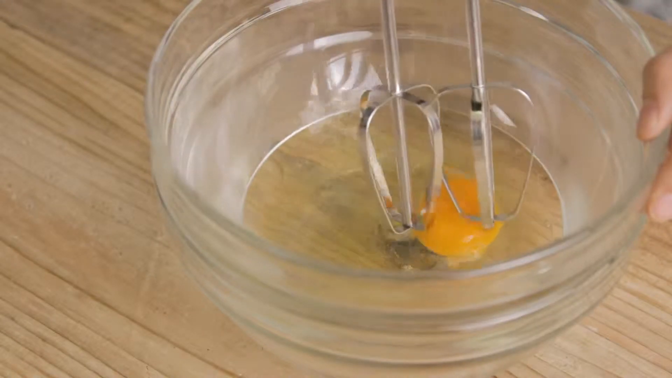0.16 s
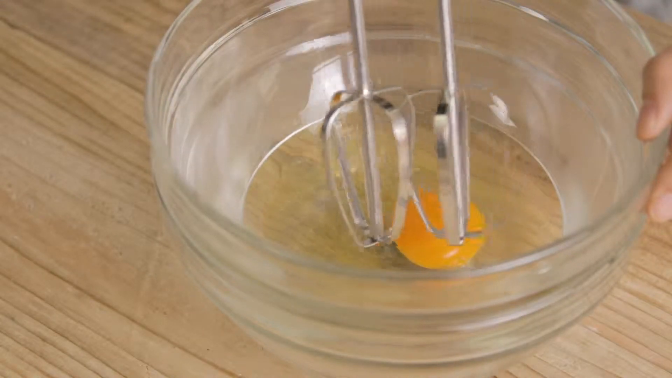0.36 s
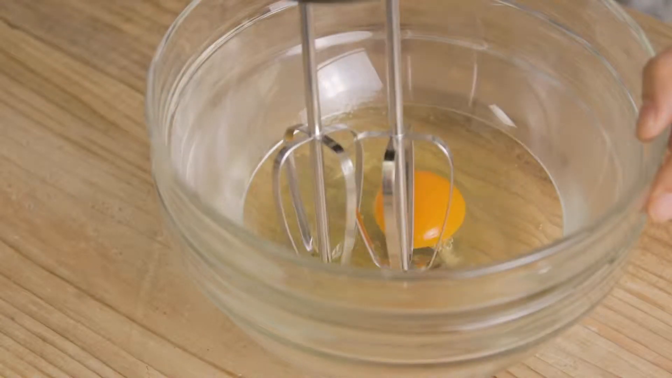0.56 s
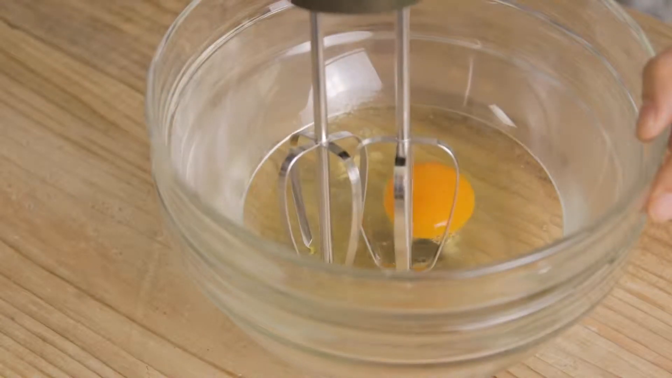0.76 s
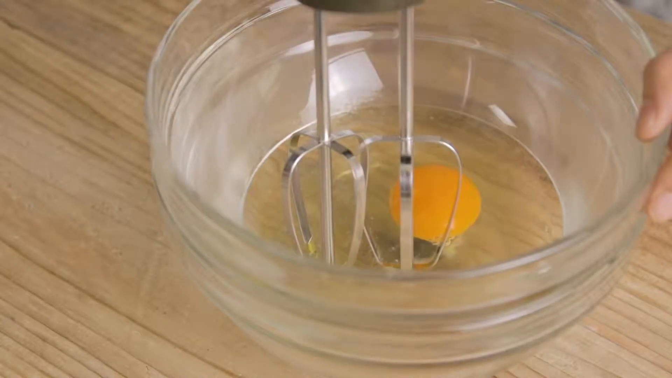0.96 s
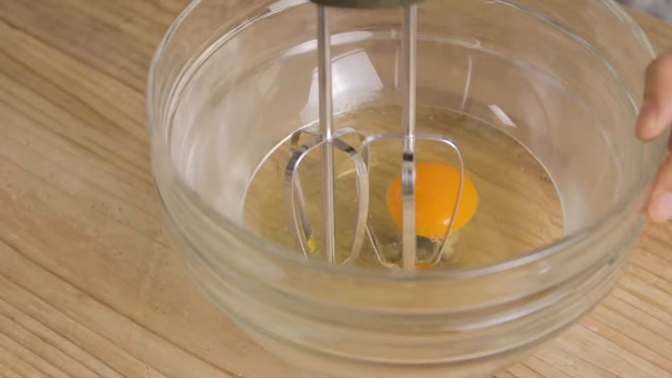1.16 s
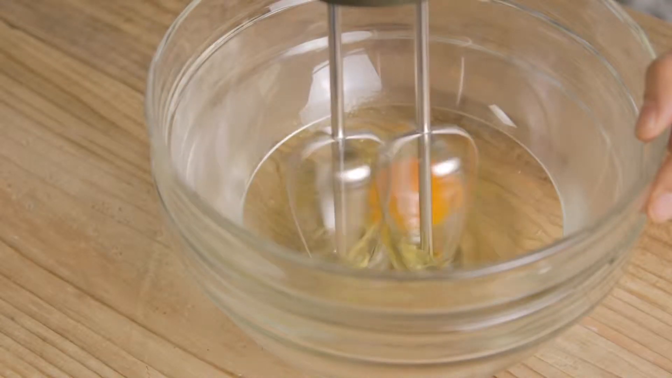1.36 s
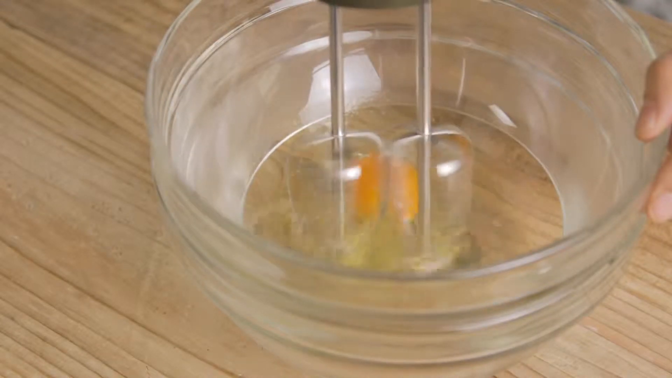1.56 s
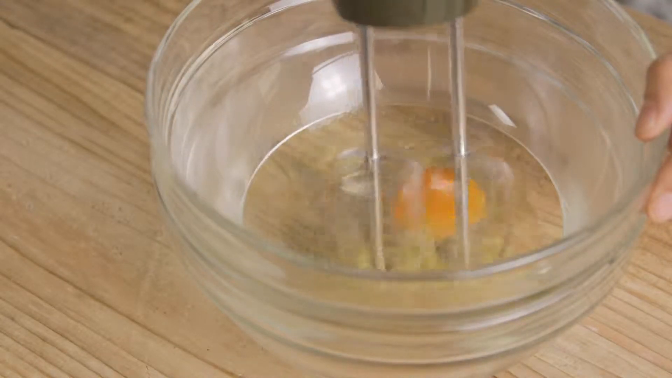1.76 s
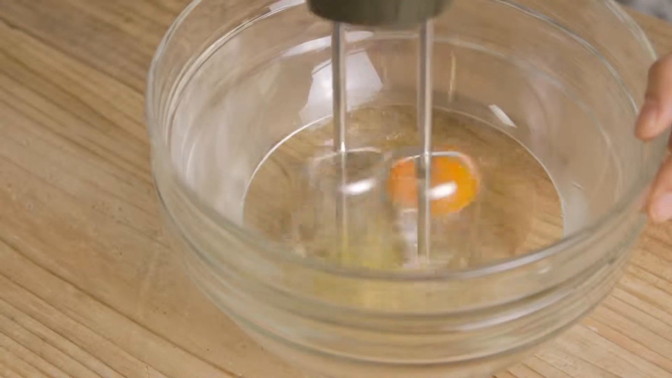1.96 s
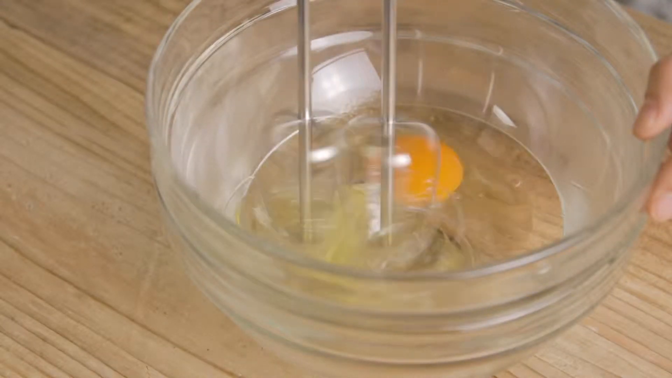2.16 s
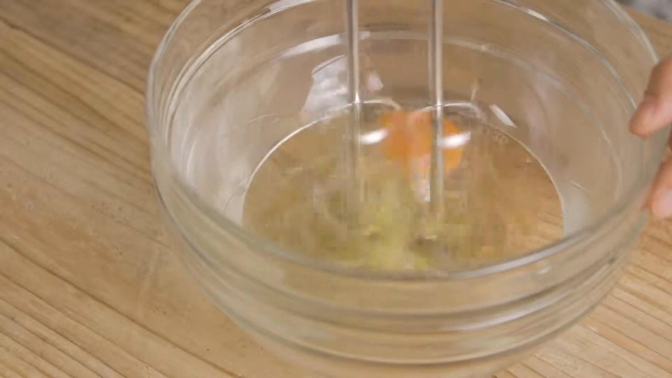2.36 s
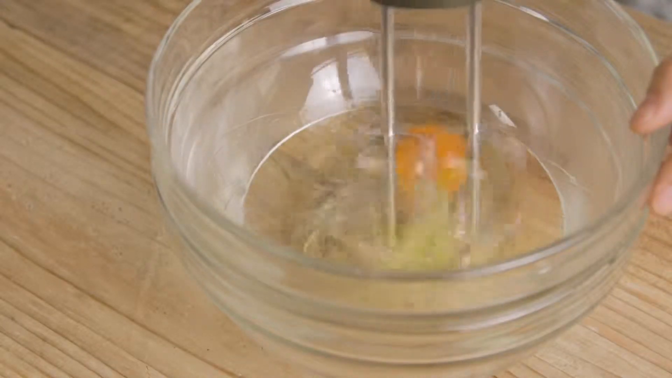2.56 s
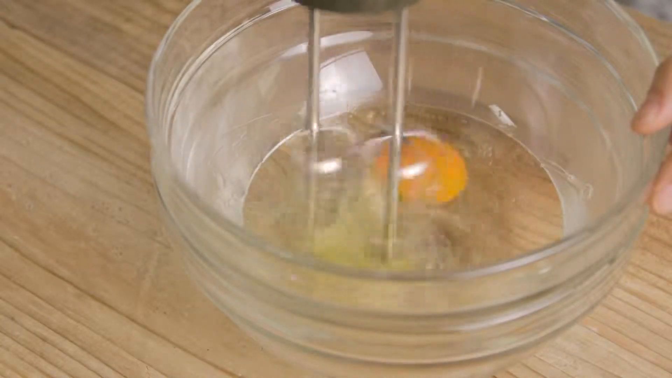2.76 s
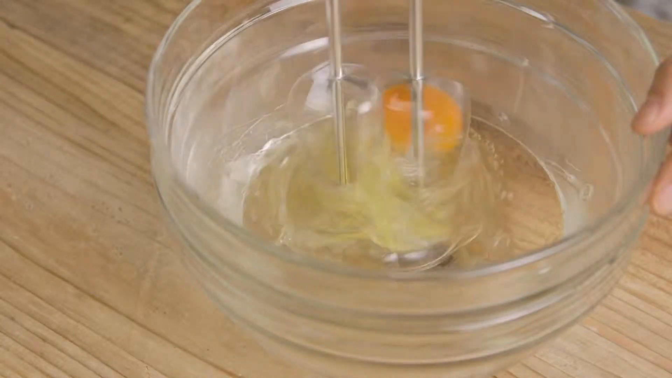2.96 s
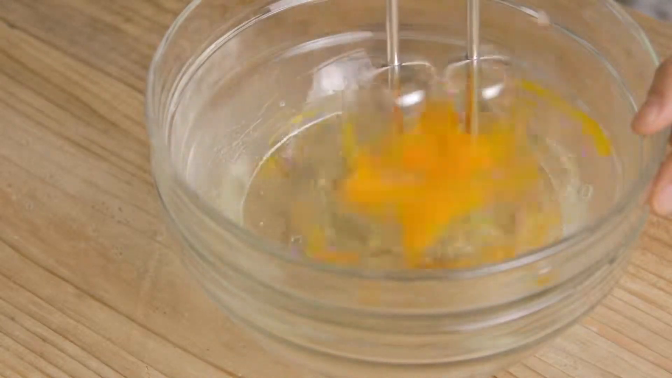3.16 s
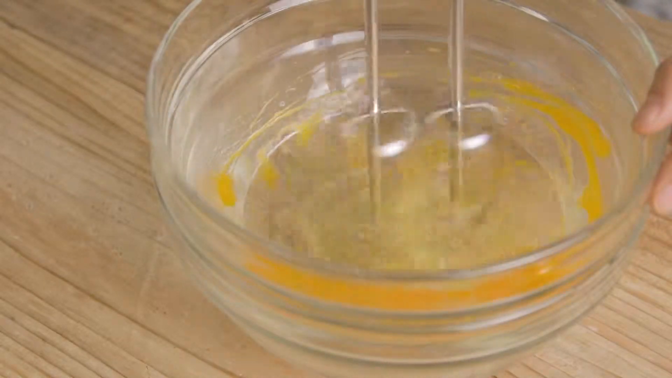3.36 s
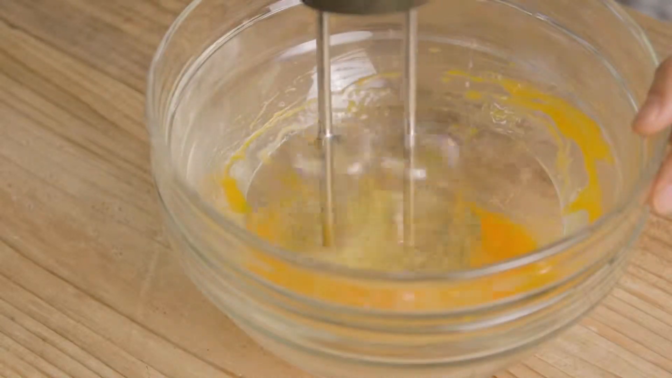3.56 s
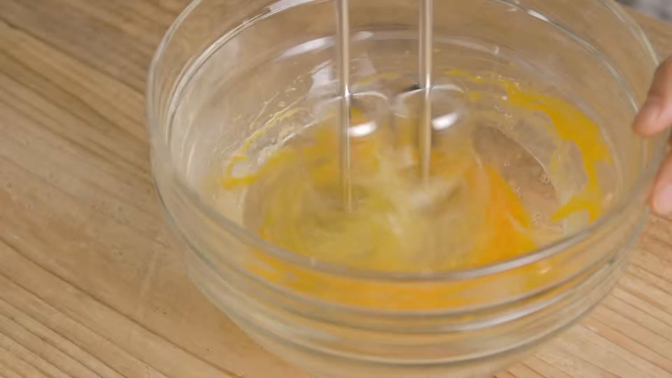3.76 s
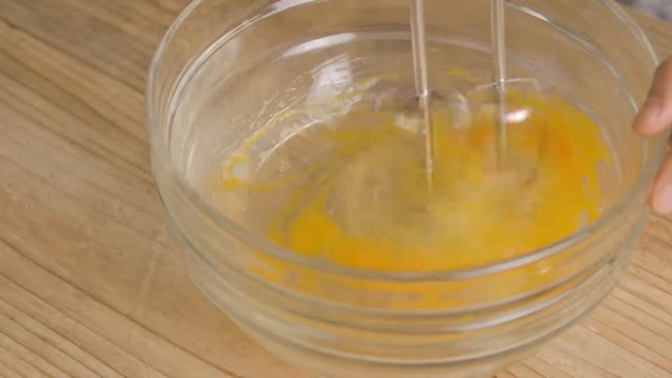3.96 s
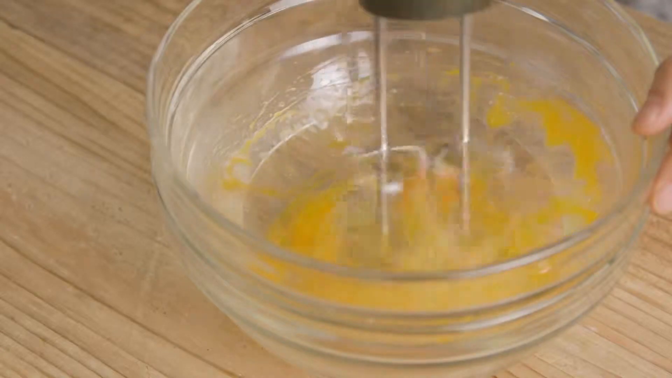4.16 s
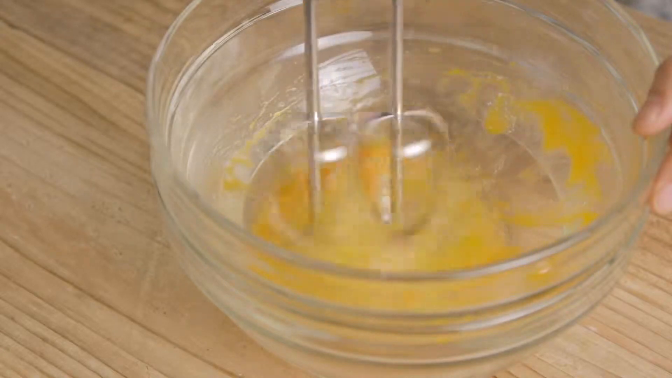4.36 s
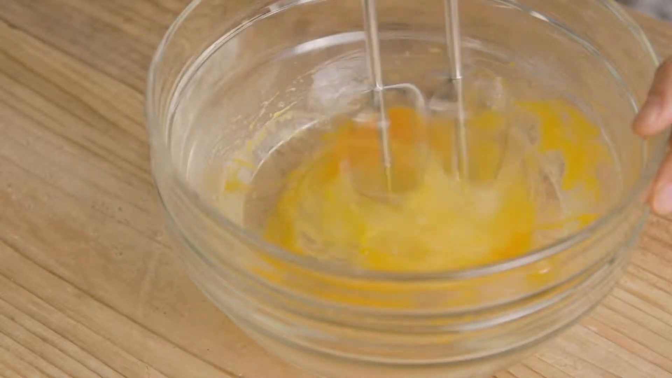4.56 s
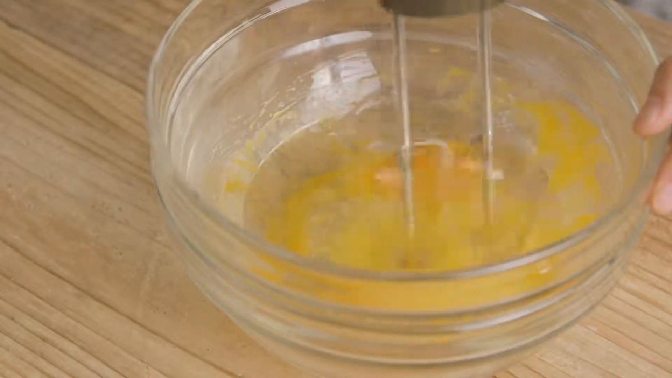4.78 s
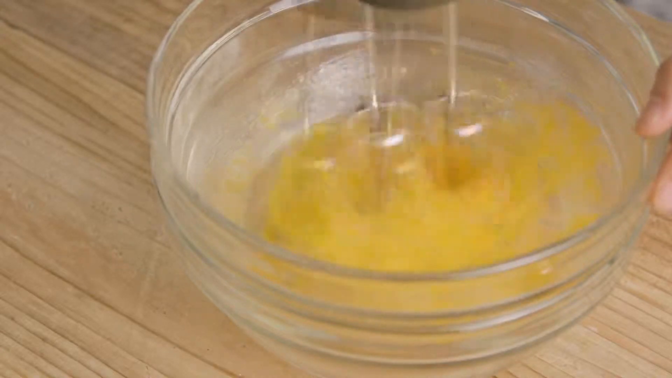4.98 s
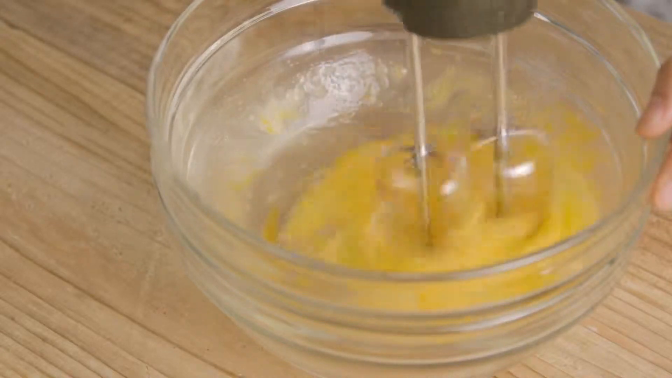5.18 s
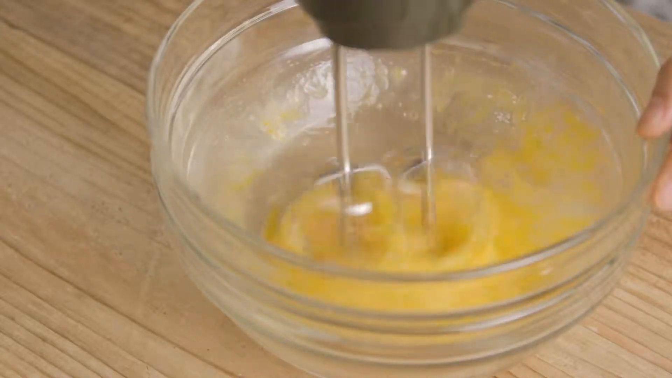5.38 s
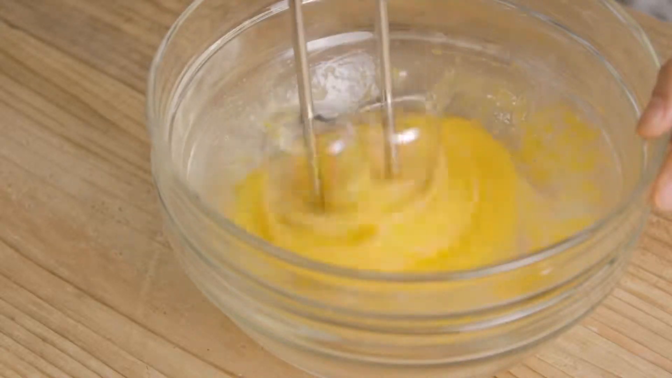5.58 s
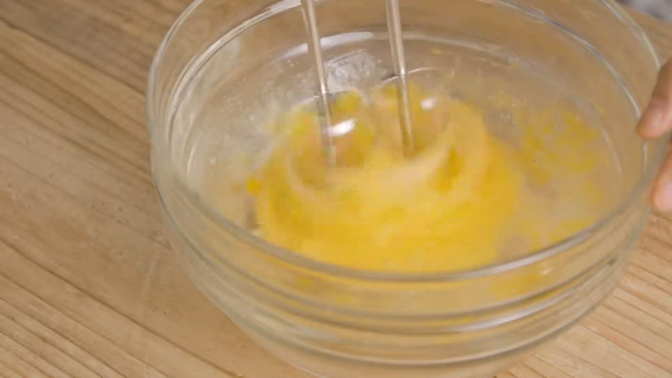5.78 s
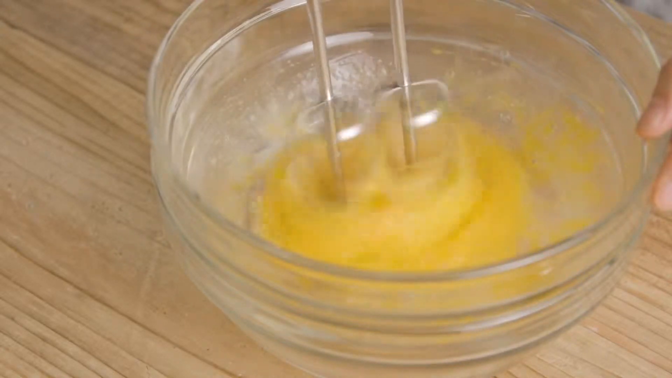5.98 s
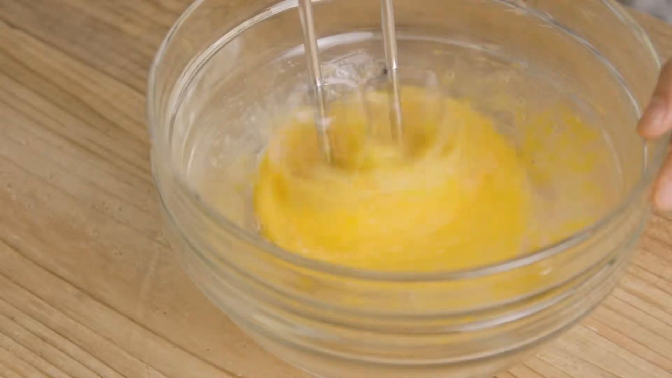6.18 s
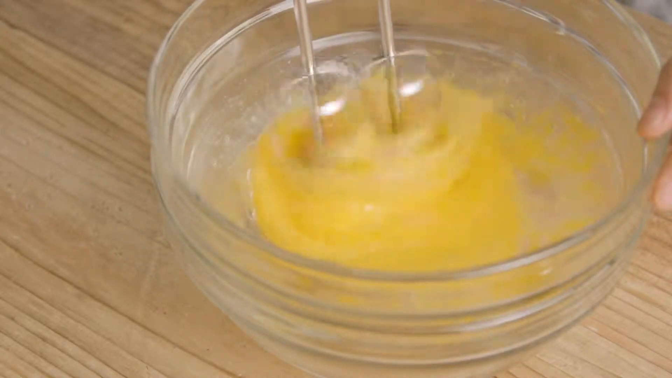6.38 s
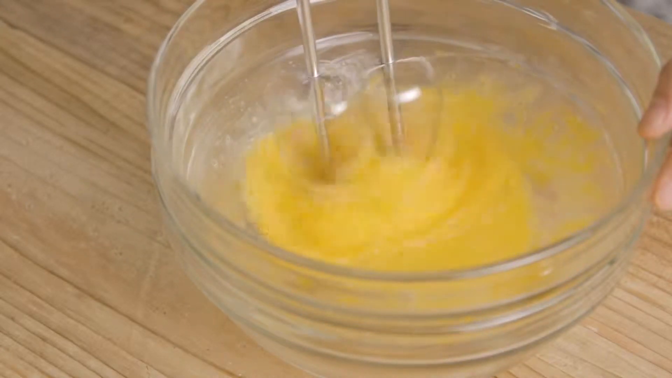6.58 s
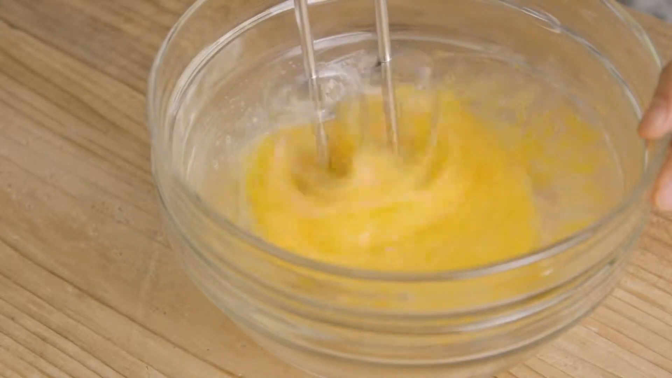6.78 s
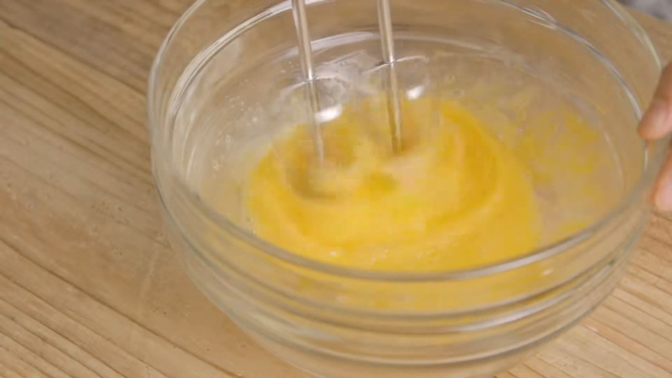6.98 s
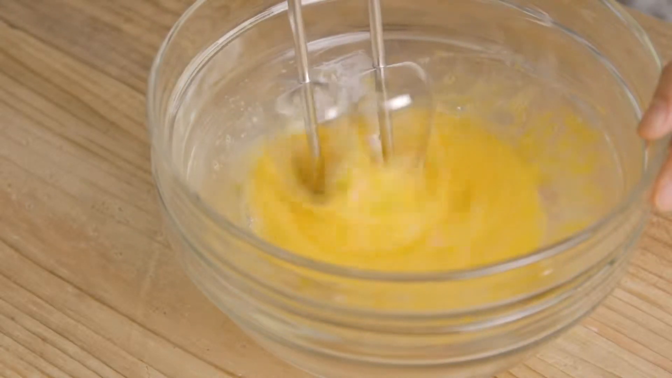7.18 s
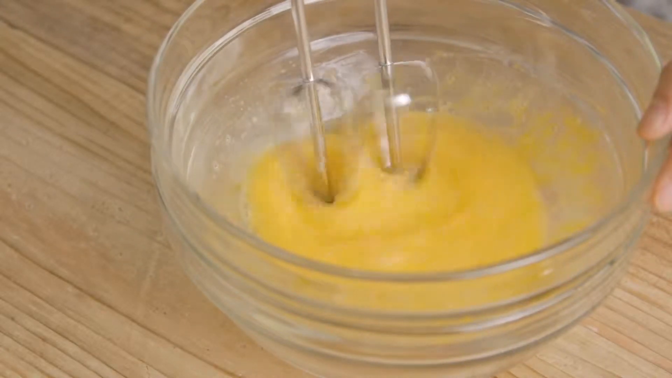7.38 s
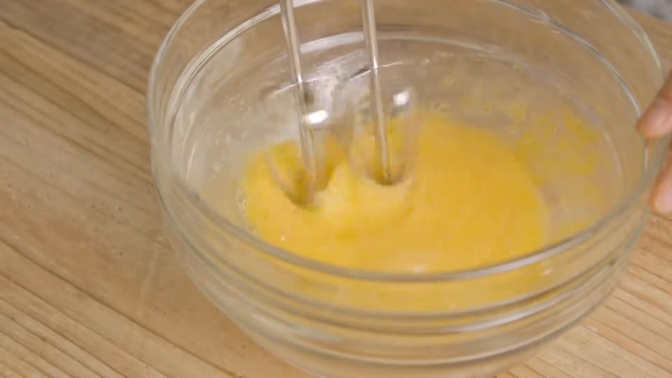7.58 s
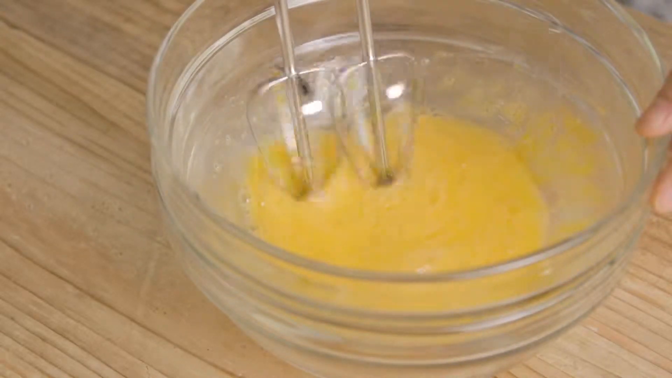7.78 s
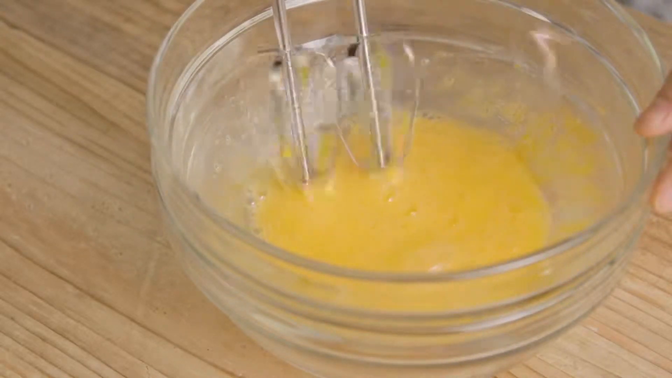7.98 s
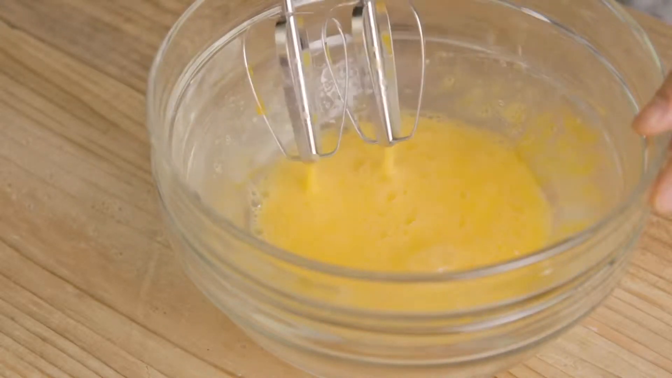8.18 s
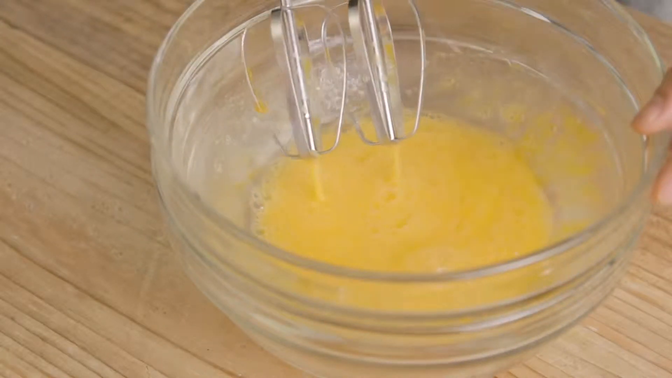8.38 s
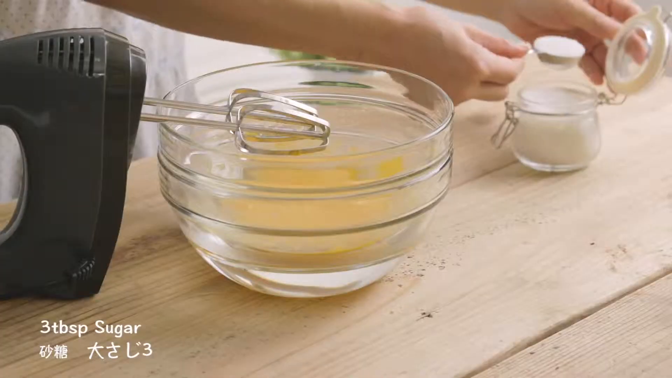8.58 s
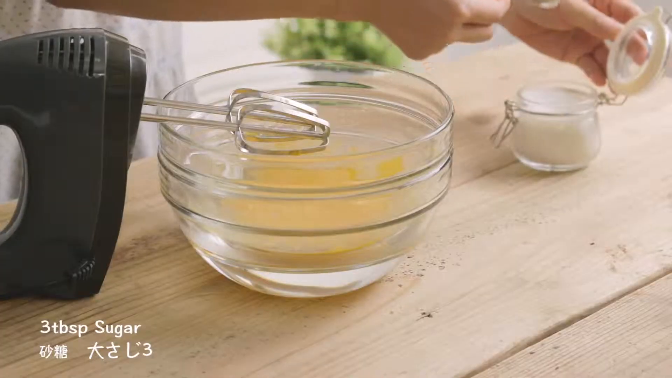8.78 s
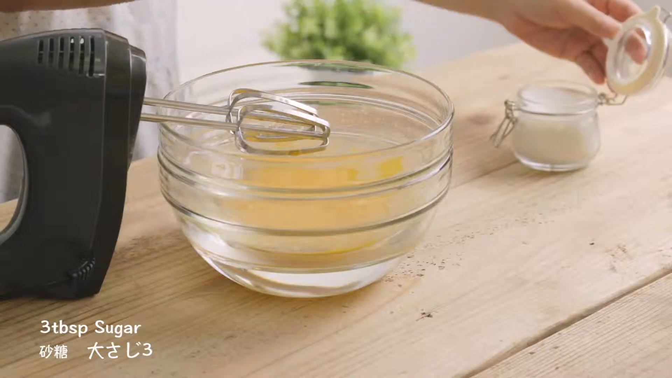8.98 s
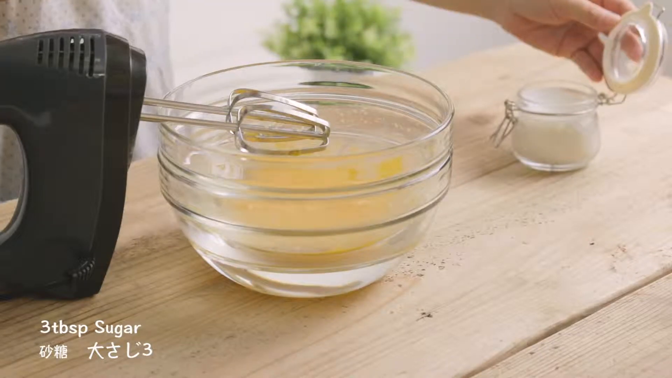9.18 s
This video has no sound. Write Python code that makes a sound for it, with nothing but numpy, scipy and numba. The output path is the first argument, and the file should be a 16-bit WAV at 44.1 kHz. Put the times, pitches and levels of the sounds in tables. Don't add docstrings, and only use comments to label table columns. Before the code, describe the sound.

In a quiet kitchen, a hand mixer clicks on, whines steadily as its wires knock a glass bowl of egg, then winds down.

```python
import sys
import numpy as np
from scipy import signal
from scipy.fft import rfft, irfft, next_fast_len
from scipy.io import wavfile
from scipy.ndimage import uniform_filter1d
from numba import njit

SR = 44100
rng = np.random.default_rng(int(sys.argv[2]) if len(sys.argv) > 2 else 0)


def unload_wav(signal):
    wavfile.write(
        sys.argv[1],
        SR,
        np.round(np.clip(np.atleast_2d(signal).T, -1, 1) * 32767).astype(np.int16),
    )


def invert_db(x):
    u = np.asarray(x, float) / 20
    return 10 ** u


N = 407484
T = np.arange(N) / SR
SWITCH_ON_S, SWITCH_OFF_S = 1.2, 7.07
POWERED = T < 7.08
LEAN_S = 4.7


# time in seconds, shaft speed in Hz.
SHAFT = [(1.2, 330), (1.3, 367), (1.45, 393), (1.55, 377.6), (1.7, 370), (1.9, 366.5), (2.15, 365),
         (2.6, 366.5), (4.01, 364), (4.9, 365.5), (5.01, 363), (5.5, 363), (7.07, 368.5)]
RUN_HZ = SHAFT[-1][1]


def rotor():
    spin_up_s, drag_s, friction_hz = .3, 10, 2950
    powered = curve(SHAFT) * (1 - np.exp(-np.maximum(T - SWITCH_ON_S, 0) / spin_up_s))
    coasting = (RUN_HZ + friction_hz) * np.exp(-(T - SWITCH_OFF_S) / drag_s) - friction_hz
    return np.maximum(np.where(T < SWITCH_OFF_S, powered, coasting), 3)


# time in seconds, hiss level in dB.
EFFORT = [(1.212, -46.5), (1.25, -31.5), (1.32, -33), (1.47, -34), (1.75, -32), (2.5, -29.5), (4.2, -30),
          (4.7, -29.5), (5.9, -28), (7.07, -32)]


def effort(shaft_hz):
    coast_db_per_octave, rub_floor_hz, stall_hz = 12.5, 26, 12
    off = T > SWITCH_OFF_S
    hiss_db = curve(EFFORT) + off * coast_db_per_octave * np.log2((shaft_hz + rub_floor_hz) / RUN_HZ)
    hiss_db = hiss_db - off * 20 * np.maximum(1 - shaft_hz / stall_hz, 0)
    tilt_db = 2.5 + off * 14 * np.maximum(1 - shaft_hz / 230, 0)
    gear_db = hiss_db + np.where(off, -22, 13 * np.log2(shaft_hz / RUN_HZ))
    inrush_s = 1.3
    slot_db = np.where(T < inrush_s, -23, -24 - .8 * (T - inrush_s))
    slot_db = np.where(off, hiss_db - 17, slot_db)
    return hiss_db, tilt_db, gear_db, uniform_filter1d(slot_db, size=3000)


def motor(shaft_hz, hiss_db, tilt_db, gear_db, slot_db):
    turns = np.cumsum(shaft_hz * (1 + .0007 * walk(60))) / SR
    fan = np.clip((shaft_hz - 110) / 190, 0, 1)
    worn_db = -4 * np.maximum(T - 5.2, 0) * POWERED
    whine = gears(turns, shaft_hz, hiss_db, gear_db)
    whine = whine + slots(turns, shaft_hz, slot_db + worn_db)
    whine = whine + commutator(turns, shaft_hz, hiss_db + worn_db / 2, fan)
    return whine + invert_db(hiss_db) * fan_and_brushes(shaft_hz, tilt_db, fan)


# multiple of shaft speed, level in dB.
GEAR_ORDERS = [(1, -8), (2, -12), (3, -13), (6, -18), (9, -1), (18, -22), (34, -37), (35, -35), (38, -32)]
# centre in Hz, width in Hz, gain in dB.
GEARBOX = [(1250, 350, 12)]


def gears(turns, shaft_hz, hiss_db, gear_db):
    over_hiss_db = hiss_db + 1.5 - 8 * np.maximum(2.3 - T, 0) - (6 + 1.5 * walk(40)) * (T > 7.13)
    singing = (T > 1.9) & (shaft_hz > 108)
    gain = invert_db(np.where(singing, np.maximum(gear_db, over_hiss_db), gear_db))
    hum = (shaft_hz / 365) ** 3 * lines(GEAR_ORDERS[:3], turns, shaft_hz, [], waver_db=1.0)
    flutter = np.where(T > LEAN_S, .24, .08) * walk(110)
    roughness = .36 * walk(350)
    mesh = lines(GEAR_ORDERS[3:], turns, shaft_hz, GEARBOX, waver_db=.6)
    return gain * (hum + (.97 + roughness + flutter) * mesh)


# multiple of shaft speed, level in dB.
SLOT_ORDERS = [(12, -21), (24, -33)]
# centre in Hz, width in Hz, gain in dB.
SHELL = [(1200, 340, 24.5), (2693, 260, 30.5), (6680, 640, 19), (4500, 370, 8.5), (8900, 900, 16.5)]


def slots(turns, shaft_hz, level_db):
    mains = 1.3 * np.clip(T - 1.6, 0, .5) * POWERED * np.sin(2 * np.pi * 100 * T)
    steady = .45 + .2 * walk(300) + .6 * np.clip(3.2 - T, 0, 1)
    return invert_db(level_db) * (steady + mains) * lines(SLOT_ORDERS, turns, shaft_hz, SHELL, waver_db=2.)


# multiple of shaft speed, level in dB against the hiss.
BRUSH_ORDERS = [(36, -31.5), (48, -35), (54, -40), (60, -35.5), (66, -38), (72, -34), (78, -40), (84, -36),
                (96, -37), (108, -38), (120, -39), (132, -41), (144, -41)]
# centre in Hz, width in Hz, gain in dB.
VENTS = [(13000, 5000, 12), (4900, 3500, 10)]


def commutator(turns, shaft_hz, level_db, fan):
    bare_db = (21 * (1 - fan) ** 2 - 6) * (T > 7.1) - 4 * (T < 1.5)
    return invert_db(level_db + bare_db) * lines(BRUSH_ORDERS, turns, shaft_hz, VENTS, waver_db=2.5)


# frequency in Hz, level in dB per Hz.
HISS = [(24, -89.5), (40, -48), (320, -14.5), (363, -12.5), (479, -11), (715, -9.5), (942, -10.5),
        (1210, -6.5), (1700, -10), (2300, -4.5), (3220, -4.5), (3650, -14), (4460, -14), (7540, -20.5),
        (13400, -30), (16000, -37.5)]
# frequency in Hz, level in dB per Hz.
COAST = [(120, -57), (200, -25.5), (366, -48), (473, -36), (683, -9.5), (916, -25.5), (1230, 0.5),
         (1650, -10), (2090, -5.5), (3020, -12.5), (4520, -15.5), (7410, -27.5), (12200, -35),
         (13100, -30.5), (16000, -37)]


def fan_and_brushes(shaft_hz, tilt_db, fan):
    rub = coloured(COAST, flicker_db=1.)
    shell = 1.7 * svf(rub, 2230., 260.) + .8 * svf(rub, 1300., 120.)
    rub = unit(rub + (T > 7) * shell)
    hiss = np.sqrt(fan) * coloured(HISS, flicker_db=0.57) + np.sqrt(1 - fan) * rub
    treble = svf(hiss, 12000., 14000.)
    tilt_db = tilt_db - 25 * np.clip((26 - shaft_hz) / 26, 0, 1) * ~POWERED
    throb = 1 + .3 * np.sin(2 * np.pi * 100 * T) * POWERED
    shake = rng.standard_normal(N) * invert_db(1.3 * walk(50))
    body = shake * np.clip((shaft_hz - 55.) / 8.9, 0, 1)
    glass = unit(wet_bowl(body, 0.94 * shake * (fan + .4), 0.46 * shake * (fan + 0.16)))
    return hiss + (invert_db(tilt_db) * throb - 1) * treble + invert_db(-3 - 2.5 * fan) * glass


def lines(orders, turns, shaft_hz, shell, waver_db):
    out = 0
    for k, db in orders:
        hz = k * shaft_hz
        shell_db = sum(gain_db / (1 + (2 * (hz - f) / width) ** 2) for f, width, gain_db in shell)
        radiate = hz ** 2 / (hz ** 2 + 450 ** 2) * (hz < 17000)
        out = out + radiate * invert_db(db + shell_db + waver_db * walk(40)) * np.sin(2 * np.pi * k * turns)
    return out


# time in seconds, peak in dB, body in dB, ping in dB.
KNOCKS = [(1.233, -31, -2, -13.5), (1.2415, -26, 9.5, -13), (1.2625, -25, 6, -16),
          (1.2728, -25.5, 4, -15.5), (1.2828, -32, 6.5, -15.5), (1.2984, -29, 6, -7),
          (1.353, -28.5, -4, -10.5), (1.3694, -21.5, 3, -5.5), (1.394, -33, -9, -10),
          (1.426, -21, 5.5, -16), (1.4444, -29.5, -1, -1), (1.47, -19, 4, -16.5), (1.554, -13, -2.5, -16.5),
          (1.6304, -16.5, -1.5, -24), (1.8567, -9, -9.5, -15.5), (1.9484, -16.5, -3, -14),
          (2.1312, -19, -13, -10), (2.349, -13, -12, -14.5), (2.5153, -14, -2.5, -9.5),
          (2.708, -7, -10.5, -17), (3.209, -18.5, -18, -0.5), (3.31, -15.5, -2.5, -20),
          (3.4214, -11.5, -5.5, -18), (3.5305, -15, -4, -11.5), (3.6417, -14, 0.5, -14.5),
          (3.7885, -18, -17, -26.5), (3.9987, -13.5, -0.5, -4), (4.0266, -16.5, -17, -5.5),
          (4.2458, -15, -6, -11), (4.3635, -12, -3, -15.5), (4.5708, -10.5, -4.5, -18),
          (5.0869, -24, -7, -16), (5.1098, -16, -5, -17), (5.3407, -12, 0, -14), (6.461, -10, -3.5, -15.5),
          (7.1168, -10.5, -2.5, -13.5), (7.1366, -12, -0.5, -12.5), (7.175, -18, -3.5, -12.5),
          (7.199, -11, -3, -15.5), (7.233, -6.5, -9, -14), (7.2665, -12.5, -4, -7.5),
          (7.2994, -11, -6.5, -8.5), (7.3338, -11.5, -3, -12.5), (7.3732, -6, -9, -16),
          (7.41, -15.5, -1.5, -14), (7.4515, -10.5, -0.5, -11), (7.4974, -20.5, 1, -15),
          (7.5393, -11.5, -4.5, -17), (7.5857, -14.5, -3, -18), (7.6341, -10.5, -4.5, -15.5),
          (7.643, -29, -6, -15), (7.6965, -24.5, -2, -11), (7.7553, -17, -5.5, -10), (7.739, -21, -7, -15),
          (7.778, -28, -5, -11)]
# frequency in Hz, level in dB, t60 in seconds.
WET_RIM = [(2900, -2, .08), (3850, -13, .07), (5080, -8.5, .085), (8200, -9, .08), (10200, -18, .05)]


def beaters(shaft_hz):
    passes = np.cumsum(shaft_hz) / SR / 10
    s, db, body_db, ping_db = np.transpose(sorted(KNOCKS + runs(shaft_hz, passes)))
    graze = np.concatenate([passes_between(a, b, passes)[1:-1] for a, b in zip(s, s[1:])])
    chance = rng.standard_normal((400, 4))[:len(graze)].T
    rise_db, coast_db = 3.5 * (graze - SWITCH_ON_S), 13 * np.maximum(graze - SWITCH_OFF_S, 0)
    graze_db = -39 + rise_db - coast_db + 0.7 * chance[1:]
    at = np.r_[s, graze + .001 * chance[0]]
    early = s < 1.7
    middle_db = db - 10 - 3.0 * early
    high_db = db + ping_db + 6 - 4 * (s > 7.15) - 5.5 * early
    body = blows(at, np.r_[db + body_db - 9, graze_db[0] - 7], push_s=0.0029, snap=18.8)
    middle = blows(at, np.r_[middle_db, graze_db[1] - 4], push_s=0.003, snap=6.0)
    ping = blows(at, np.r_[high_db, graze_db[2] - 5], push_s=0.0024, snap=6.6)
    choked_db = 25 * np.clip((s - 1.5) / .6, 0, 1)
    ring = blows(s, db + 0.3 * ping_db - 21.5 - choked_db, push_s=0.0021, snap=6.0)
    return wet_bowl(body, middle, ping) + dry_bowl(ring, WET_RIM)


# first and last knock in seconds, peak in dB,
# dB by which every second pass is weaker.
RUNS = [(4.6824, 4.736, -9.5, 10), (4.787, 4.901, -9, 5.5), (5.143, 5.25, -14, -3.5),
        (5.509, 5.698, -12, 6), (5.72, 5.9447, -11.5, -0.5), (6.0506, 6.185, -15, -2.5),
        (6.243, 6.4323, -12.5, -4.5), (6.49, 6.9235, -10, 1), (7.005, 7.091, -11, -0.5)]


def runs(shaft_hz, passes):
    rows = []
    for a, b, db, weak_db in RUNS:
        s = passes_between(a, b, passes)
        weak = np.arange(len(s)) % 2
        chance = 1.6 * rng.standard_normal((30, 3))[:len(s)].T
        speed_db = 6 * np.log2(np.interp(s, T, shaft_hz) / RUN_HZ)
        db = db - weak_db * weak + speed_db + chance[0]
        body_db = -4.5 + 0.3 * weak_db * weak + chance[1] - chance[0]
        ping_db = -15.5 + chance[2] - chance[0]
        rows += list(zip(s - .001 * weak + .0008 * chance[2], db, body_db, ping_db))
    return rows


def passes_between(a, b, passes):
    first, last = np.interp([a, b], T, passes)
    count = max(round(last - first), 1)
    return np.interp(np.linspace(first, last, count + 1), passes, T)


# centre in Hz, width in Hz, level in dB.
WET_BOWL = [(710, 95, 5.5), (1290, 110, 5), (2120, 220, -1), (2750, 260, 0), (3400, 400, -1),
            (3950, 400, 1), (4450, 320, 3), (5150, 200, -5), (6300, 400, -7), (7150, 400, -3),
            (8350, 380, -2), (9200, 300, -9), (10400, 800, -2), (14500, 1500, -12)]


def wet_bowl(body, middle, ping):
    modes = 0
    for f, width, db in WET_BOWL:
        force = body if f < 1800 else middle if f < 6000 else ping
        struck = svf(force * invert_db(db + 1.5 * walk(30)), f, 5. * width)
        modes = modes + np.sqrt(1000 / width) * svf(struck, f, width, drift=1 + .012 * walk(6))
    splash = svf(svf(ping, 10000.0, 23000.0), 10000.0, 23000.0)
    splash = splash + svf(svf(middle, 4000.0, 4000.), 4000.0, 4000.)
    return modes + invert_db(-14) * splash


SPLIT = (.992, 1, 1.006)


def dry_bowl(force, modes):
    t = T[:SR // 2]
    ring = 0
    for f, db, t60 in modes:
        decay = invert_db(db - 5 - 60 * t / t60)
        ring = ring + decay * sum(np.sin(2 * np.pi * f * k * t) for k in SPLIT)
    return signal.fftconvolve(force, ring)[:N]


# time in seconds, level in dB.
CLINK = [
    (0.658, -28.5),
    (0.6605, -26.5),
    (.665, -23),
    (0.697, -39),
    (.724, -50),
]
# frequency in Hz, level in dB, t60 in seconds.
DRY_BOWL = [(592, -11, .14), (1240, -17, .1), (1400, -22, .17), (2266, -20, .26), (2756, -10, .28),
            (2880, -7, .17), (3806, -19, .2), (4920, -16, .25), (5080, -14, .2), (5873, -24, .17),
            (6067, -26, .17), (6831, -21, .2), (7612, -28, .2), (8170, -9, .19)]


def clink():
    landing = np.transpose(CLINK)
    ring = dry_bowl(blows(*landing - [[0], [26]], push_s=0.00064, snap=4.2), DRY_BOWL)
    chatter = blows(*landing, push_s=0.0018, snap=9.6)
    chatter = chatter + blows([.668, .7, .74], [-44, -50, -58], push_s=.012)
    table = svf(svf(svf(chatter, 1100., 900.), 1100., 1100.), 1100., 1300.)
    wires = svf(svf(chatter, 4500., 5000.), 4500., 8000.)
    return ring + invert_db(3.5) * table + invert_db(-8) * wires


# time in seconds, level in dB.
TICKS = [
    (0.558, -39),
    (.562, -42.5),
    (0.593, -58),
    (1.213, -19.5),
    (1.2255, -29),
    (8.318, -64.5),
]
# centre in Hz, width in Hz, level in dB.
SWITCH = [(1250, 350, 0), (2200, 500, 0), (3500, 700, -4), (4500, 900, -1), (9500, 2500, -12)]


def switch_ticks():
    tick = blows(*np.transpose(TICKS), push_s=0.0012, snap=6.)
    out = 0
    for f, width, db in SWITCH:
        out = out + invert_db(db + 3) * svf(svf(tick, f, width, drift=1.), f, 3. * width, drift=1.)
    return out


# time in seconds, level in dB.
RUSTLE = [(8.485, -76), (8.5, -77), (8.515, -77), (8.53, -82)]


def rustle():
    return svf(svf(blows(*np.transpose(RUSTLE), push_s=.006), 14000., 5000.), 14000., 5000.)


# time in seconds, pitch in Hz, level in dB.
DROPS = [
    (0.015, 1360, -62),
    (1.085, 1410, -73),
    (1.755, 1456, -21),
]
# time in seconds, pitch in Hz, level in dB.
THUDS = [
    (1.45, 72.4, -55.5),
    (4.85, 113, -48.5),
]


def plops_and_bumps():
    out = 0
    for rows, cycles in ((DROPS, 9.), (THUDS, 5.5)):
        for s, hz, db in rows:
            out = out + invert_db(db) * np.exp(-((T - s) * hz / cycles) ** 2) * np.sin(2 * np.pi * hz * T)
    return out


# start in seconds, hold in seconds, level in dB.
LOW_DRONE = [(8.504, .03, -71), (8.8, .1, -66), (8.94, 0.048, -51), (9.07, 0.13, -58)]
HIGH_DRONE = [(8.49, 0.21, -62), (8.79, .1, -65), (8.95, 0.067, -61)]


def rumble():
    low, high = rng.standard_normal((2, N))
    low = unit(svf(svf(low, 120.0, 22.), 110.0, 40.) + 0.15 * svf(low, 62.0, 13.0))
    high = unit(svf(svf(high, 165.0, 25.), 170.0, 50.) + 0.094 * svf(high, 230.0, 126.0))
    return swells(LOW_DRONE) * low + swells(HIGH_DRONE) * high


def swells(table):
    gain = 0
    for s, hold, db in table:
        rise_db, fall_db = 297.5 * np.maximum(s - T, 0), 130 * np.maximum(T - s - hold, 0)
        gain = gain + invert_db(db - rise_db - fall_db)
    return gain


# frequency in Hz, level in dB per Hz.
KITCHEN = [(15, -68), (25, -37), (87, -7.5), (134, -8), (277, -10), (439, -24), (476, -16.5), (516, -23),
           (1650, -32.5), (2000, -31.5), (16000, -60.5)]


def kitchen():
    air = invert_db(-92) * (T > 8.483) * unit(svf(rng.standard_normal(N), 6000., 12000.))
    return air + invert_db(-69) * coloured(KITCHEN)


def room(x):
    t60_s, level_db = 0.41, -15
    t = T[:SR // 2]
    tail = rng.standard_normal((2, len(t)))
    tail = svf(tail[0], 2200.0, 4000.) * invert_db(-60 * t / t60_s) + 0.89 * tail[1] * invert_db(-60 * t / (1.2 * t60_s))
    tail *= t > .006
    return x + invert_db(level_db) * signal.fftconvolve(x, tail / np.sqrt(np.sum(tail ** 2)))[:N]


def blows(s, db, push_s, snap=0.):
    hits = np.zeros(N + SR)
    np.add.at(hits, (np.asarray(s) * SR).astype(int), invert_db(db))
    t = np.arange(2000) / (push_s * SR)
    push = signal.fftconvolve(hits, np.e * t * np.exp(-t))[:N]
    return snap * hits[:N] + push * rng.standard_normal(N)


def coloured(spectrum, flicker_db=0.):
    hz, db = np.transpose(spectrum)
    size = next_fast_len(N)
    f = np.maximum(np.arange(size // 2 + 1) * SR / size, 1)
    noise = rfft(rng.standard_normal(size)) * invert_db(np.interp(np.log(f), np.log(hz), db))
    octave = np.log2(f / 40)
    out = 0
    for k in range(10):
        band = irfft(noise * np.clip(1 - abs(octave - k), 0, 1), size)[:N]
        out = out + band * invert_db(flicker_db * walk(12))
    return unit(out)


def walk(rate):
    k = int(SR / rate)
    steps = np.repeat(rng.standard_normal(N // k + 1), k)
    return unit(uniform_filter1d(uniform_filter1d(steps, k), k)[:N])


def curve(table):
    return np.interp(T, *np.transpose(table))


def unit(x):
    return x / np.sqrt(np.mean(x ** 2))


def svf(x, hz, width, drift=0.89):
    return sweep(x, np.tan(np.pi * hz / SR) * drift + np.zeros(len(x)), width / hz)


@njit
def sweep(x, g, k):
    y, band, low = np.empty(len(x)), 0., 0.
    for i in range(len(x)):
        v = (band + g[i] * (x[i] - low)) / (1 + g[i] * (g[i] + k))
        band, low, y[i] = 2 * v - band, low + 2 * g[i] * v, k * v
    return y


def scene():
    shaft_hz = rotor()
    running = uniform_filter1d(1. * (T > EFFORT[0][0]), size=200)
    mixer = running * motor(shaft_hz, *effort(shaft_hz)) + beaters(shaft_hz)
    mixer = signal.sosfilt(signal.butter(2, 90, "high", fs=SR, output="sos"), mixer)
    handling = clink() + switch_ticks() + rustle() + plops_and_bumps()
    return (room(mixer + handling) + rumble() + kitchen())[None]


def band_limit(x):
    return signal.sosfilt(signal.butter(12, 16460, fs=SR, output="sos"), x)


def record(dry):
    mix = .33 * np.tanh(dry / .33)
    mix = signal.sosfilt(signal.ellip(10, .2, 70, 15800, fs=SR, output="sos"), mix)
    return band_limit(mix)


dry = scene()
out = record(dry)
unload_wav(out)
```